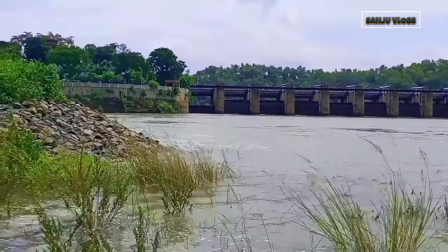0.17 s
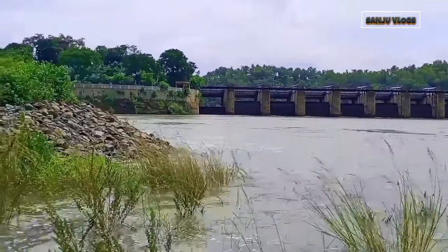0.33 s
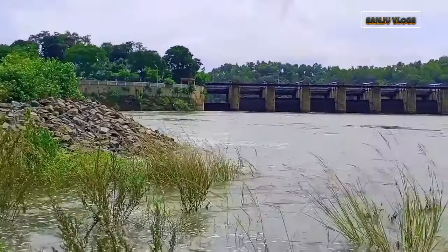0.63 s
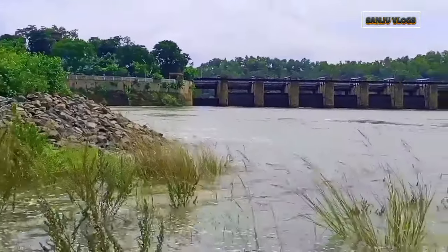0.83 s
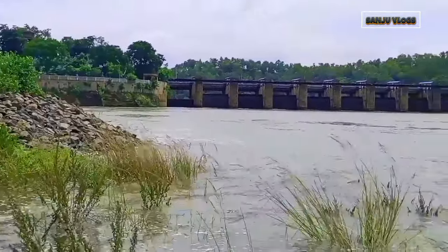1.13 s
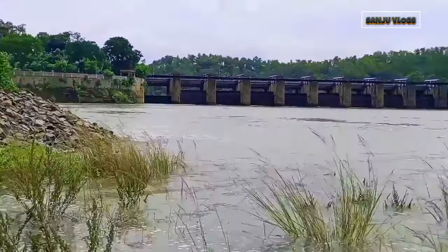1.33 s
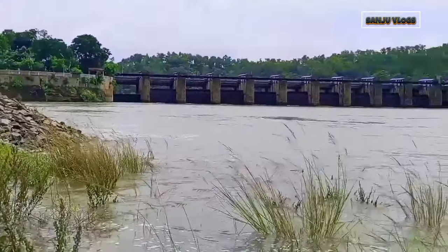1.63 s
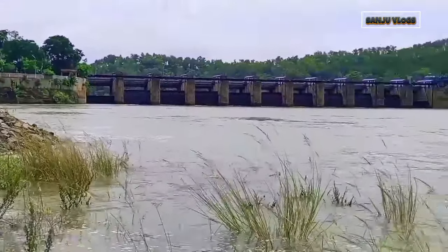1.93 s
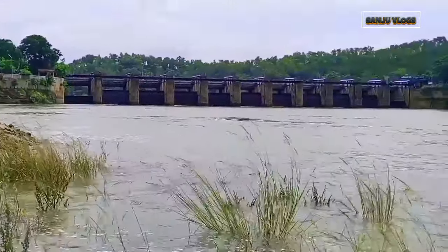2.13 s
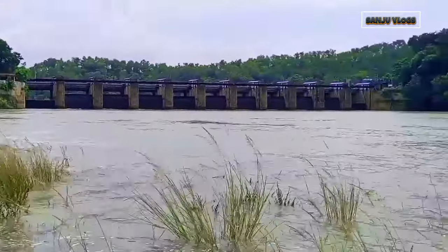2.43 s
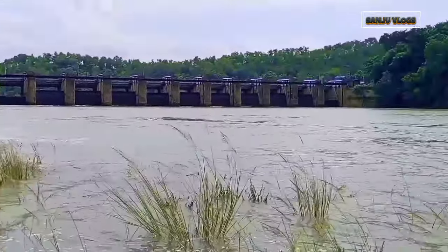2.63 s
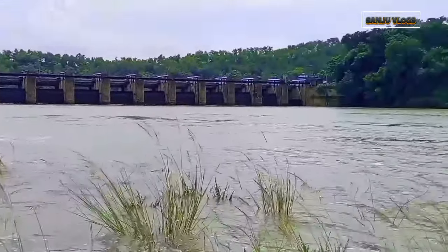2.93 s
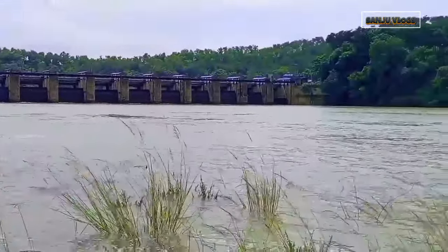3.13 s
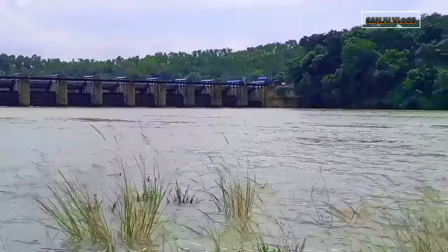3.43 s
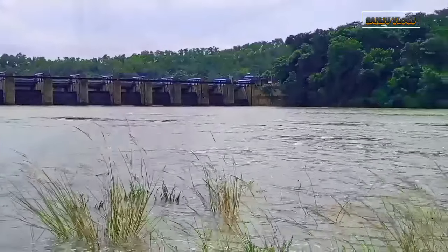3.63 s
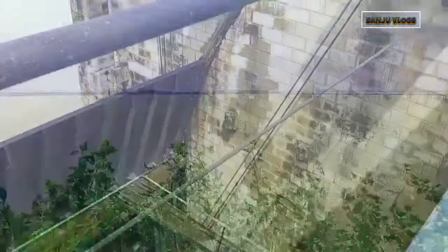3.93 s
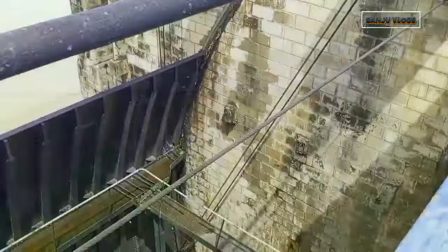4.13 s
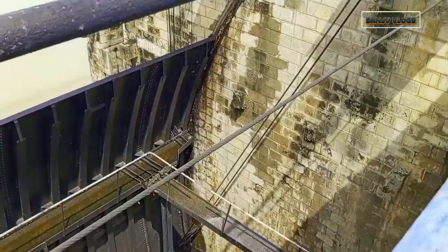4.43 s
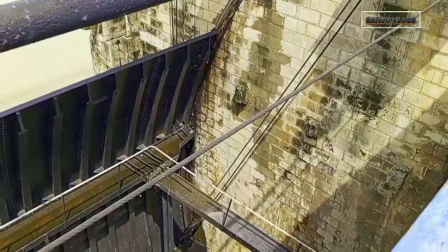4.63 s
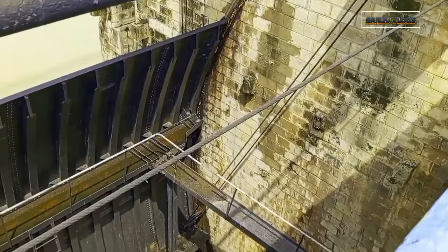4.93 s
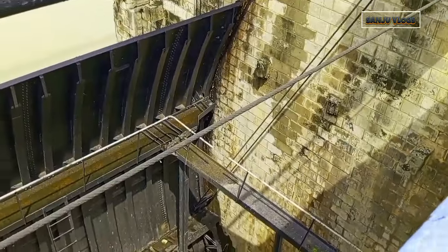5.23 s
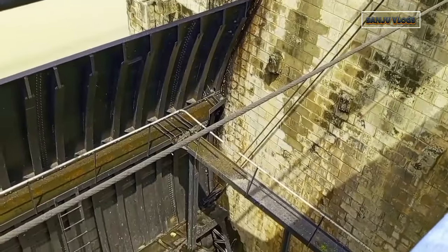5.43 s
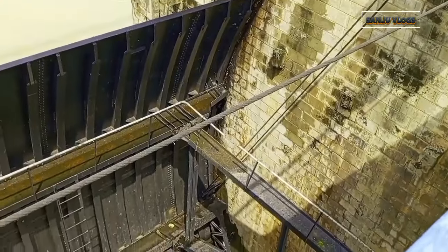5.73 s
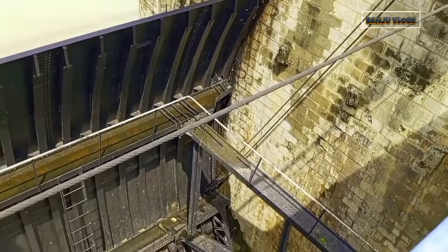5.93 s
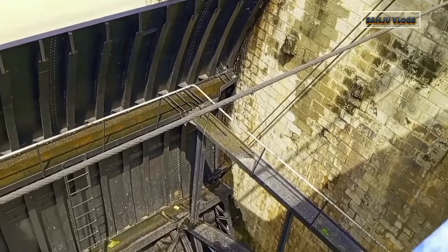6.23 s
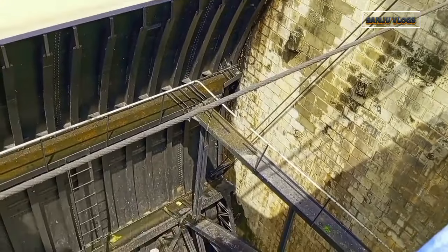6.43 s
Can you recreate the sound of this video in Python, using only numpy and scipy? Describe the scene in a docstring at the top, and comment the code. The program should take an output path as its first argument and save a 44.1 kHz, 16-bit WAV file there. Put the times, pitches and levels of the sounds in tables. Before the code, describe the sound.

Outdoors on a reservoir shore, distant water hisses softly while gusts of wind rumble and thump on the microphone. Small wavelets lap, with a few drips and faint ticks of dry reeds. About halfway through, the shore fades into a much louder, close roar of water rushing through a dam sluice gate, with hissing spray, low thuds, a brief low drone and a faint machine hum.

```python
"""Reservoir shore and sluice gate

Far water hisses, wind buffets the microphone, wavelets and drips ring as small bubbles, reeds tick.
The shore fades and a dam's sluice gate comes up close: its jet churns, thuds and throws a dense spray
of bubbles, with a brief low drone and a faint machine hum inside the roar. Mono."""
import sys
import numpy as np
from scipy import signal
from scipy.fft import rfft, irfft, next_fast_len
from scipy.io import wavfile
from scipy.ndimage import uniform_filter1d, map_coordinates

SR = 44100
rng = np.random.default_rng(int(sys.argv[2]) if len(sys.argv) > 2 else 0)


def persist_wave(psi):
    """Save psi, clipped to +-1, as 16-bit WAV."""
    counts = np.round(np.clip(psi, -1, 1) * 32767).astype(np.int16)
    wavfile.write(sys.argv[1], SR, np.atleast_2d(counts).T)


N = 289737

# strength of the wavelets: time_s, level_db
LAPPING = [(0.9, -63), (1.45, -60), (1.7, -60.5), (2.0, -57), (2.25, -56.5), (2.55, -61), (2.8, -57.5),
           (3.0, -61), (3.25, -68)]


def amp(db):
    """Decibels to gain."""
    return 10 ** (np.asarray(db) / 20)


def unit(x):
    """Scale to rms 1."""
    return x / np.sqrt(np.mean(x ** 2) + 1e-20)


def fade(start_s, end_s):
    """Linear rise from 0 to 1."""
    return np.clip((np.arange(N) / SR - start_s) / max(end_s - start_s, 1e-3), 0, 1)


def curve(rows):
    """Straight lines through (time_s, value) points."""
    return np.interp(np.arange(N) / SR, *np.transpose(rows))


def swing(rows):
    """Level curve minus the mean of its points."""
    return curve(rows) - np.mean(np.array(rows)[:, 1])


def wobble(rate_hz):
    """Smooth random curve, rate_hz knots a second."""
    knots = rng.standard_normal(int(N * rate_hz / SR) + 4)
    return map_coordinates(knots, [np.arange(N) * rate_hz / SR])


def filtered(x, response):
    """Apply the gain response(hz)."""
    size = next_fast_len(N + SR // 2)
    return irfft(rfft(x, size) * response(np.fft.rfftfreq(size, 1 / SR)), size)[:N]


def coloured(x, spectrum):
    """Shape x by (freq_hz, gain_db) points on a log axis; rms 1."""
    freq_hz, gain_db = np.transpose(spectrum)
    return unit(filtered(x, lambda hz: amp(np.interp(np.log(hz + 1), np.log(freq_hz), gain_db))))


def bell(x, centre, width):
    """Gaussian with peak 1."""
    return np.exp(-0.5 * ((x - centre) / width) ** 2)


def band(centre_hz, width_hz):
    """Gaussian noise band; rms 1."""
    return unit(filtered(rng.standard_normal(N), lambda hz: bell(hz, centre_hz, width_hz)))


def turbulence(patchy_db, frame=1024):
    """White noise whose gain drifts in patches of time and pitch."""
    spectra = signal.stft(rng.standard_normal(N), nperseg=frame)[2]
    patches = uniform_filter1d(rng.standard_normal(spectra.shape), size=8, axis=0)
    patches = unit(uniform_filter1d(patches, size=8, axis=1))
    return unit(signal.istft(spectra * amp(patchy_db * patches), nperseg=frame)[1][:N])


def bubbles(low_hz, high_hz, decay_cycles, spread_db, count, samples=200):
    """Swarm of damped rings of uneven strength; rms 1."""
    when, pitch, weakness = rng.random((count, 3)).T
    pitch_hz = low_hz + (high_hz - low_hz) * pitch
    cycles = pitch_hz[:, None] * np.arange(samples) / SR
    gain = amp(-spread_db * weakness) * np.sqrt(pitch_hz / SR)
    rings = gain[:, None] * np.sin(2 * np.pi * cycles) * np.exp(-cycles / decay_cycles)
    index = (when * N).astype(int)[:, None] + np.arange(samples)
    return unit(np.bincount(index.ravel(), rings.ravel(), N)[:N])


def thumps(rows, pitch_drift):
    """Each thump is a few low, uneven swings of the air."""
    out, t = np.zeros(N + SR), np.arange(-SR // 10, SR // 10) / SR
    for centre_s, width_s, pitch_hz, level_db in rows:
        drift = np.tanh(map_coordinates(rng.standard_normal(20), [np.linspace(0, 19, len(t))]))
        phase = 2 * np.pi * (rng.random() + np.cumsum(pitch_hz * np.exp(pitch_drift * drift)) / SR)
        envelope = np.sqrt(2) * amp(level_db) * bell(t, 0, width_s)
        out[round(centre_s * SR) - SR // 10:][:len(t)] += envelope * np.sin(phase)
    return out[:N]


def lake(level_db=-44.5, rise_db_per_s=0.5):
    """Far water: a hiss dulled by distance, growing a little as the microphone turns."""
    spectrum = [(100, -8), (400, 7.5), (500, 4), (600, 9), (760, 7.5), (870, 6.5), (1020, -0.5), (2000, 1),
                (2300, -3), (3020, -7), (3400, -15.5), (3800, -13.5), (4150, -27), (4650, -24),
                (5150, -16.5), (6100, -6.5), (8000, -24.5), (11000, -37), (13600, -49)]  # freq_hz, gain_db
    hiss_db = level_db + rise_db_per_s * np.arange(N) / SR
    return amp(hiss_db) * coloured(turbulence(patchy_db=1.0), spectrum)


def wind(breeze_db=-39.5, freshen_db=8, flutter_db=0.5, attack_s=0.01, release_s=0.022):
    """A breeze flutters on the microphone and freshens; gusts hit fast, hold and let go."""
    spectrum = [(22, -31), (45, -20.5), (65, -8), (100, -4.5), (130, 1), (165, -3.5), (210, -3),
                (290, -8.5), (420, -12.5), (480, -27.5), (700, -43), (1500, -64), (4000, -120)]  # freq_hz, gain_db
    gusts = [(0.35, 0.063, 3), (0.557, 0.18, 3.5), (0.76, 0.27, 3.5), (1.13, .2, 4), (1.402, .03, 6),
             (1.498, 0.16, 5), (1.743, 0.16, 3.5), (2.15, 0.32, 2), (2.531, 0.1, 7), (2.732, 0.093, 6),
             (2.884, 0.051, 9), (3.094, 0.06, 5), (3.18, 0.23, 1)]  # start_s, length_s, lift_db
    buffet_db = breeze_db + freshen_db * fade(2.79, 3.29) + flutter_db * wobble(22)
    for start_s, length_s, lift_db in gusts:
        end_s = start_s + length_s
        buffet_db += lift_db * (fade(start_s, start_s + attack_s) - fade(end_s, end_s + release_s))
    return amp(buffet_db) * coloured(turbulence(patchy_db=1.0), spectrum)


def eddies(trim_db=-1):
    """The strongest eddies thump on the microphone port."""
    hits = [(0.791, 0.0042, 253, -26), (0.823, .016, 79, -30), (0.855, 0.013, 128.5, -28),
            (0.998, 0.016, 167.4, -35), (1.597, 0.021, 112.4, -34), (2.571, 0.025, 152.8, -28.5),
            (2.614, 0.013, 111.6, -25.5), (2.786, 0.013, 153, -29), (2.905, 0.014, 216.3, -22.5),
            (3.125, .025, 144, -27.5), (3.203, 0.018, 120.7, -23), (3.26, .03, 99.3, -31),
            (3.425, 0.044, 130.5, -28)]  # centre_s, width_s, pitch_hz, level_db
    return amp(trim_db) * thumps(hits, pitch_drift=0.22)


def wavelets(lap_db=2.0, lap_rate_hz=14):
    """Wavelets lap at the shore and shed small bubbles."""
    lapping = amp(curve(LAPPING) + lap_db * wobble(lap_rate_hz))
    return lapping * bubbles(2300, 3180, decay_cycles=7.4, spread_db=10, count=2500, samples=700)


def reeds(click_decay_s=0.0024, ring_decay_s=0.006, click_trim_db=-0.5, ring_trim_db=1, rustle_db=-78):
    """Dry stems tick together and ring briefly, over a faint crackle that follows the wavelets."""
    ticks = [(1.046, -58, -66), (1.375, -72, -61), (1.508, -61, -68), (1.520, -56, -64), (1.543, -62, -66),
             (1.970, -68, -59), (2.015, -69, -59), (2.063, -70, -59), (2.440, -63, -67), (2.597, -64, -72),
             (2.690, -61, -65), (2.783, -70, -62), (2.807, -55, -68), (2.854, -66, -63), (2.954, -68, -55)]  # start_s, click_db, ring_db
    click_spectrum = [(2000, -22), (4500, -12), (7500, 3), (9500, 1), (11300, -2), (12300, -7),
                      (13700, -16), (14900, -7), (16000, -10)]  # freq_hz, gain_db
    stem_modes = [(7500, 280, 7), (11200, 380, -6)]  # centre_hz, width_hz, gain_db
    t = np.arange(SR // 20) / SR
    contact = amp(rustle_db + 0.4 * swing(LAPPING) + 3 * wobble(110))
    ringing = np.zeros(N)
    for start_s, click_db, ring_db in ticks:
        start = round(start_s * SR)
        contact[start:][:len(t)] += amp(click_db + click_trim_db) * np.exp(-t / click_decay_s)
        ringing[start:][:len(t)] += amp(ring_db + ring_trim_db) * np.exp(-t / ring_decay_s)
    modes = unit(sum(amp(db) * band(hz, width_hz) for hz, width_hz, db in stem_modes))
    return contact * coloured(rng.standard_normal(N), click_spectrum) + ringing * modes


def drips(attack_s=0.00069, ring_decay_s=0.0025, chirp_per_s=0.9, splash_db=-9, splash_decay_s=0.0068):
    """Each drip traps a bubble whose pitch climbs as it dies, inside a small splash."""
    drops = [(1.488, 2600, -36.5), (1.500, 2470, -37.5), (1.512, 6150, -33), (1.516, 2530, -32),
             (1.532, 2650, -36), (2.369, 2930, -34), (2.782, 3020, -37), (2.806, 2800, -40)]  # start_s, pitch_hz, level_db
    out, t = np.zeros(N), np.arange(SR // 20) / SR
    bins_hz = np.fft.rfftfreq(len(t), 1 / SR)
    for start_s, pitch_hz, level_db in drops:
        ring = np.sin(2 * np.pi * pitch_hz * t * (1 + chirp_per_s * t)) * np.exp(-t / ring_decay_s)
        splash_band = bell(bins_hz, pitch_hz, 0.091 * pitch_hz)
        noise = unit(irfft(rfft(rng.standard_normal(len(t))) * splash_band, len(t)))
        drip = ring + amp(splash_db) * noise * np.exp(-t / splash_decay_s)
        out[round(start_s * SR):][:len(t)] += amp(level_db) * drip * (1 - np.exp(-t / attack_s))
    return out


def hum(fundamental_hz=59.6, waver_db=3):
    """A machine on the dam: a few low, wavering harmonics."""
    harmonics = [(2, -10), (3, -8), (4, -34)]  # multiple, gain_db
    phase = 2 * np.pi * np.cumsum(fundamental_hz * (1 + 0.00546 * wobble(4.68))) / SR
    return np.sqrt(2) * sum(amp(db + waver_db * wobble(5.4)) * np.sin(k * phase) for k, db in harmonics)


def drone(pitch_hz=70, octave_db=-10, waver_db=3.5, octave_waver_db=3):
    """A low tone with its octave swells, wavers and dies away."""
    levels = [(3.82, -58), (3.98, -35), (4.15, -28.5), (4.29, -23.5), (4.42, -34), (4.55, -30), (4.76, -35),
              (4.86, -60)]  # time_s, level_db
    phase = 2 * np.pi * np.cumsum(pitch_hz * (1 + 0.013 * wobble(9.2))) / SR
    octave = amp(octave_db + octave_waver_db * wobble(6.9)) * np.sin(2 * phase)
    envelope = np.sqrt(2) * amp(curve(levels) + waver_db * wobble(6.1))
    return envelope * (np.sin(phase) + octave)


def sheets(trim_db=-1, relative_width=0.16):
    """Sheets of water collapse, each a broad surge within the rush."""
    collapses = [(5.505, 0.031, 1010, -24.5), (5.52, 0.037, 2700, -36), (5.84, 0.032, 3180, -29),
                 (6.064, 0.035, 1070, -27.5), (6.262, 0.032, 970, -26.5)]  # centre_s, width_s, centre_hz, level_db
    t = np.arange(N) / SR
    return sum(amp(db + trim_db) * bell(t, centre_s, width_s) * band(hz, relative_width * hz)
               for centre_s, width_s, hz, db in collapses)


def thuds(trim_db=-1):
    """Slugs of water slam into the pool under the gate."""
    slugs = [(4.36, 0.022, 293.3, -20), (4.385, 0.051, 135.6, -21), (4.585, 0.022, 142, -21),
             (5.27, 0.04, 118.4, -24), (5.56, 0.032, 311, -22), (5.73, 0.033, 226, -24.5),
             (5.85, 0.028, 183, -23), (6.08, 0.027, 110.8, -19.5), (6.505, 0.021, 260.8, -17)]  # centre_s, width_s, pitch_hz, level_db
    return amp(trim_db) * thumps(slugs, pitch_drift=0.144)


def churn(gain_db=5.5, surge_db=1.5, surge_rate_hz=16, gulp_db=-10, hum_db=-3.5):
    """Deep water heaves and big air pockets gulp; the hum rides the same surges."""
    spectrum = [(13, -56), (22, -35), (38, -18.5), (102, 2), (125, 0), (200, -0.5), (245, 1.5), (305, -2),
                (345, -4.5), (420, -6), (660, -10.5), (1000, -15.5), (1300, -25.5), (2200, -120)]  # freq_hz, gain_db
    heave = [(4.35, -16.5), (4.6, -15), (4.95, -12.5), (5.05, -16.5), (5.22, -12.5), (5.38, -18.5),
             (5.5, -15.5), (6.1, -15), (6.55, -16)]  # time_s, unscaled_db
    boil = coloured(turbulence(patchy_db=1.1), spectrum)
    surges = amp(gain_db + 0.51 * swing(heave) + surge_db * wobble(surge_rate_hz))
    gulps = bubbles(230, 470, decay_cycles=6, spread_db=12, count=300, samples=6000)
    return surges * (boil + amp(gulp_db) * gulps + amp(hum_db) * hum())


def spray(gain_db=4.0, fizz_db=-13.5, bay_hz=1540, bay_width_hz=35, bay_db=-3):
    """Mist and tiny bubbles hiss almost evenly; the gate bay rings faintly at one pitch."""
    spectrum = [(600, -15), (760, -4.5), (950, 1), (1300, -2), (2400, -2.5), (3200, -1), (3850, -2),
                (4500, -19.5), (5100, -9), (6100, -1.6), (8000, -13), (9500, -8), (11000, -8.5),
                (12200, -18), (13700, -30), (14900, -28), (15800, -28)]  # freq_hz, gain_db
    contour = [(4.35, -26), (4.6, -25.5), (4.78, -25), (5.35, -25.5), (5.45, -24.5), (5.82, -25),
               (5.98, -26), (6.1, -25.5), (6.24, -25), (6.39, -25), (6.5, -25.5)]  # time_s, relative_db
    mist = turbulence(patchy_db=1.3, frame=512)
    fizz = amp(fizz_db) * bubbles(630, 15660, decay_cycles=4.2, spread_db=5, count=14000)
    foam = filtered(mist + fizz, lambda hz: 1 + amp(bay_db) / (1 + ((hz - bay_hz) / bay_width_hz) ** 2))
    return amp(gain_db + swing(contour)) * coloured(foam, spectrum)


def splash(gain_db=-3.5, waver_db=0.9):
    """Larger bubbles ring longer and make the rush coarse."""
    envelope = amp(gain_db + waver_db * wobble(18))
    return envelope * bubbles(757, 3780, decay_cycles=42, spread_db=18, count=2200, samples=1800)


def sluice(flow_db=-27, rise_db_per_s=0.12, arrival_s=4.35, fade_power=0.97):
    """The jet under the gate: one slowly growing flow drives churn, spray and splash."""
    flow = amp(flow_db + rise_db_per_s * (np.arange(N) / SR - arrival_s))
    bass = fade(3.42, 4.21) ** fade_power * churn()
    treble = fade(3.396, arrival_s) ** fade_power * (spray() + splash())
    return flow * (bass + treble)


def scene():
    """The shore gives way to the sluice; both channels are the same."""
    shore = wind() + eddies() + lake() + wavelets() + drips() + reeds()
    gate = sluice() + sheets() + thuds() + drone()
    mono = shore * (1 - fade(3.27, 5)) + gate
    return np.array([mono, mono])


def record(dry, cutoff_hz=15750):
    """Brick-wall low-pass."""
    return np.array([filtered(channel, lambda hz: hz < cutoff_hz) for channel in dry])


dry = scene()
out = record(dry)
persist_wave(out)
```